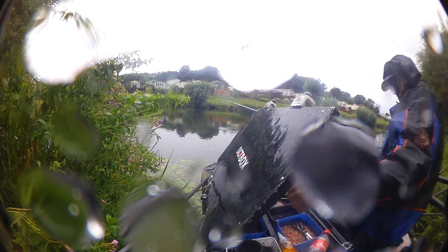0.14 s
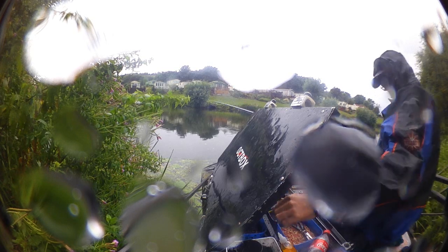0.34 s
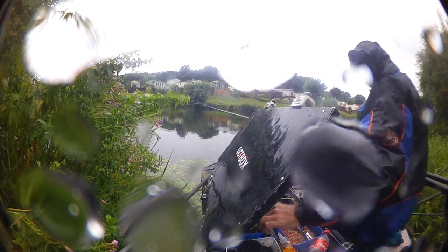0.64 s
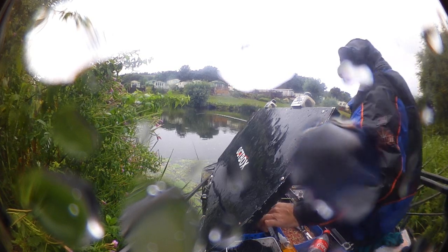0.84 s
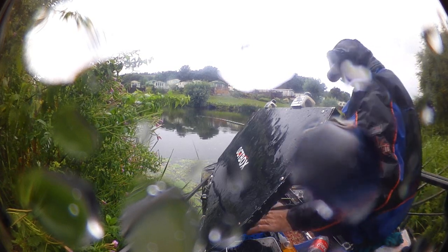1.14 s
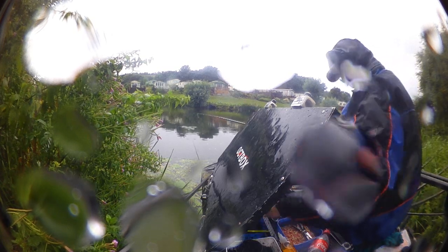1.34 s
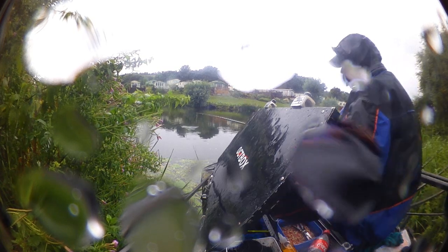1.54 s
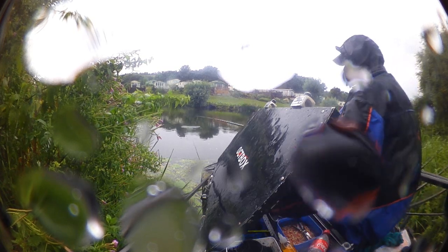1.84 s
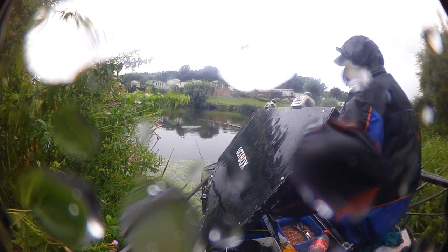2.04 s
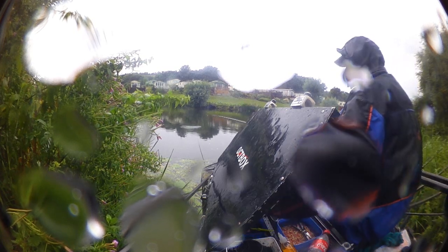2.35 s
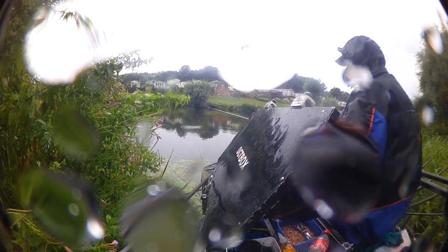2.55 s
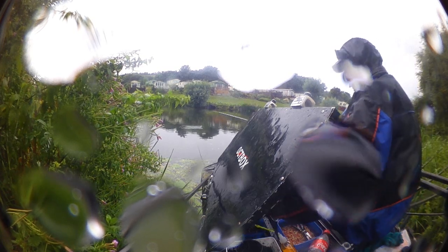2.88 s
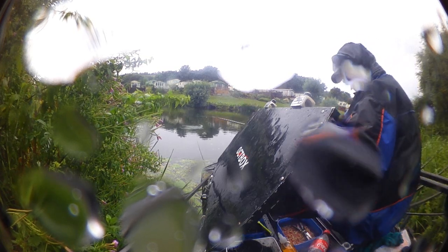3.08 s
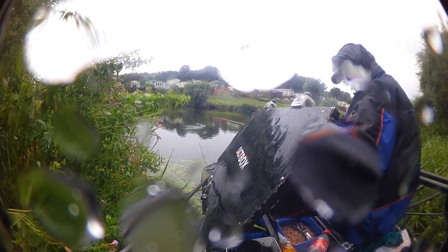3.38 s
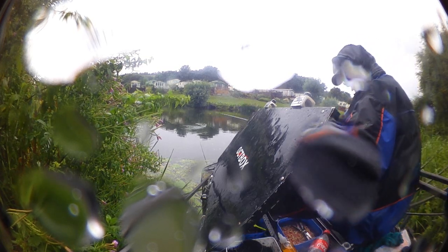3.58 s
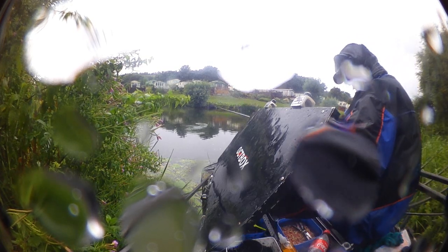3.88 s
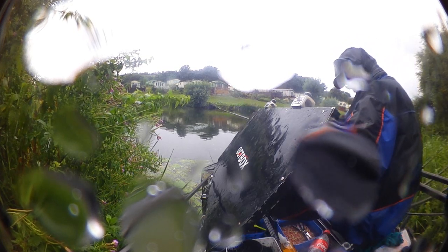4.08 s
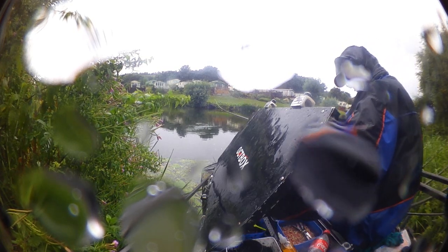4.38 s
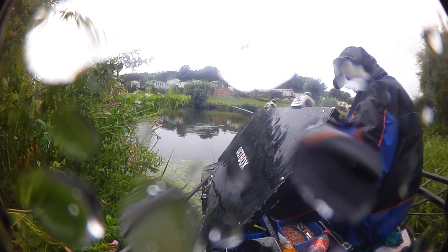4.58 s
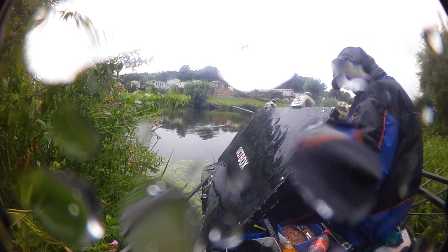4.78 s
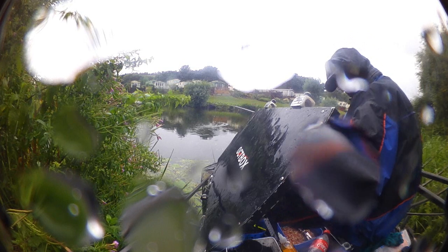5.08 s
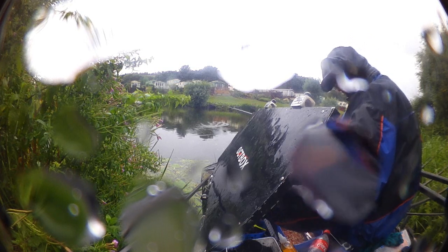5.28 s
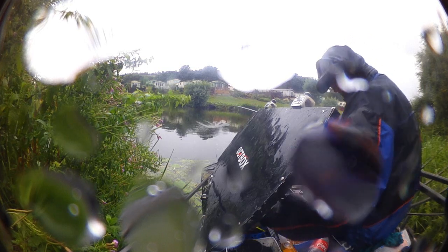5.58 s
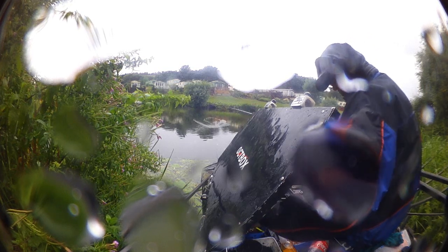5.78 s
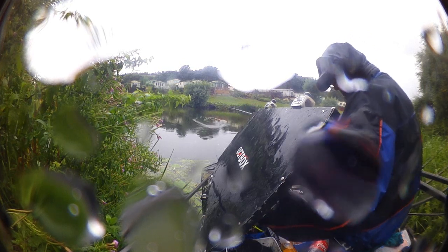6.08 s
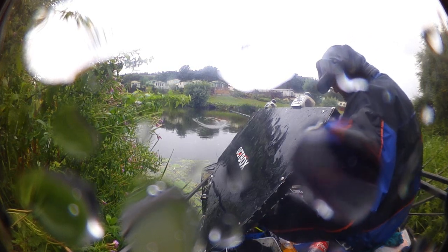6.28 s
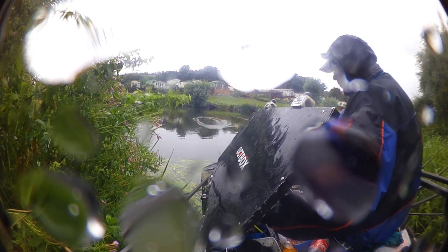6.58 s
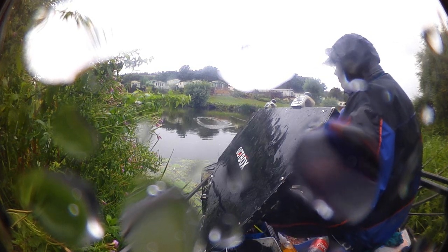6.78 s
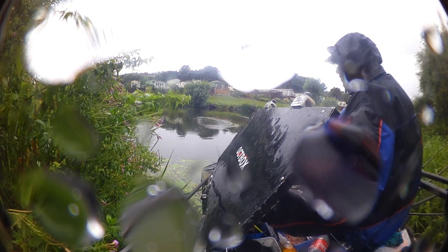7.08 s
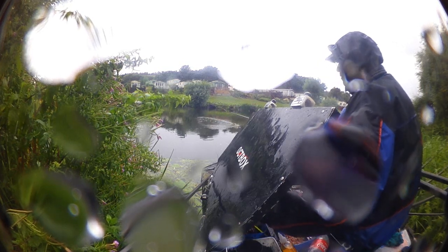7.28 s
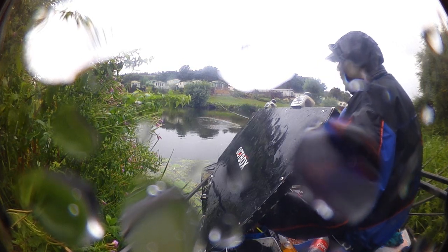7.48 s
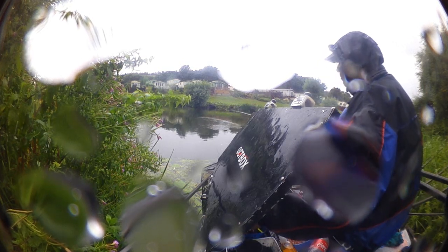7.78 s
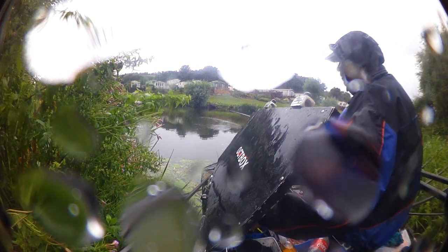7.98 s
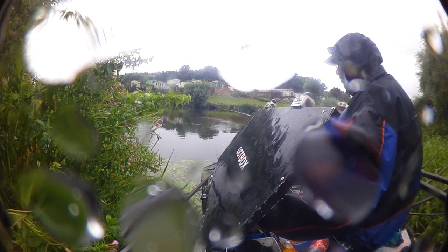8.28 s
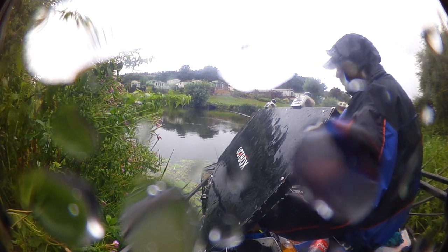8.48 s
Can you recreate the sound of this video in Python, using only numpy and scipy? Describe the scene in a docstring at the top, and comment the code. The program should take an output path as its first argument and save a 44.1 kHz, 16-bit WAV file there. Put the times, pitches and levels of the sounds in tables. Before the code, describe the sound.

Raindrops tap and ring on a plastic camera case as an angler shifts on a knocking platform, with muffled rain pattering on an umbrella.

```python
"""River bank in the rain, heard from inside a camera's waterproof case next to an angler's umbrella.
Drops close by tap the case and ring its shell as decaying modes, and splash with a fizz of shaped noise.
The fishing platform knocks, clacks and rumbles and its seat squeaks once, from modes, noise and a gliding
tone; wet cloth rustles and sleeves swish as bands of noise. A bubble drips once. Farther off, muffled
patter on the umbrella is a shower of random bursts, over a faint steady hiss."""
import sys
import numpy as np
from scipy import signal
from scipy.fft import rfft, irfft, next_fast_len
from scipy.io import wavfile
from scipy.ndimage import uniform_filter1d

SR = 44100
rng = np.random.default_rng(int(sys.argv[2]) if len(sys.argv) > 2 else 0)


def dump_mix(stems):
    """Bounce the given channels to the path in sys.argv[1] as a 16-bit WAV at rate SR."""
    frames = np.atleast_2d(stems).T  # one column per channel
    limited = np.clip(frames, -1, 1)  # hard clip at full scale
    pcm = np.round(limited * 32767).astype(np.int16)
    wavfile.write(sys.argv[1], SR, pcm)


N = 380927

# All levels in dB are relative: trims, random variation and envelopes come on top.
# Larger drops on the case. Each row: start in seconds, level in dB, pitch of the dent in Hz, crack in dB,
# spray in dB, shell ring over the dent in dB, hollow low modes over the other modes in dB.
CASE_DROPS = [(0.579, -47, 1170, -75, -80, -3, -14), (0.807, -40, 1380, -60.5, -78, -4, -7),
              (0.873, -44.5, 1110, -78, -90, 2, -1), (1.103, -38, 1230, -64, -69, 0, -14),
              (1.3683, -34, 1230, -56, -69, 7, -1.5), (1.658, -45.5, 1342, -79, -89, 2, 9.5),
              (2.77, -43.5, 1280, -78, -88, -5, 4), (3.542, -44.5, 1460, -77, -92.5, 0.5, -14),
              (3.696, -39.5, 1290, -78, -85, -2.5, -2.5), (3.911, -44, 1300, -64, -92, 0, -6),
              (3.923, -40, 1270, -72, -100.5, -6, -26), (3.962, -39, 1520, -60, -70.5, 2.5, -10),
              (3.994, -41.5, 1270, -58, -84, 8, 1), (4.344, -25.5, 1200, -56, -75, -5, -9),
              (4.4, -34.5, 1170, -55.5, -62.5, -2, -30), (4.504, -41.5, 1400, -61, -84, 7, -14),
              (4.587, -32, 1380, -59, -70, -2.5, -4.5), (4.719, -40.5, 1250, -72, -82, 1, -10),
              (4.752, -31.5, 1320, -52.5, -68, -4, -27), (4.906, -29.5, 1340, -54, -69, -5.5, 5),
              (4.998, -40, 1330, -57.5, -89, -1, 9.5), (5.041, -45.5, 1300, -66, -92, 3, 10),
              (5.19, -26.5, 1450, -53.5, -65, -3.5, 1.5), (5.327, -23, 1260, -46.5, -55, -3.5, -5),
              (5.531, -31, 1240, -53.5, -69, 3, -1.5), (5.668, -35.5, 1290, -53, -62, -1, -4),
              (5.699, -36, 1360, -66, -91, -4.5, -16), (5.768, -41.5, 1220, -62, -80.5, 9, -20),
              (6.07, -23.5, 1270, -46, -59.5, -2, -27), (6.383, -38, 1330, -76, -72, -4.5, -14),
              (6.451, -48, 1430, -83, -88, 3, -9), (6.748, -44.5, 990, -72, -90, -12, -9),
              (6.803, -42.5, 1220, -79, -69.5, 0, 3.5), (6.869, -41, 1180, -68, -78, 4, -1.5),
              (6.883, -44.5, 1310, -72, -88, -0.5, -15), (6.894, -49, 1210, -78, -84, -6, -23),
              (6.99, -49, 1320, -72, -102, 1, -18), (7.1133, -38.5, 780, -54, -66, -7.5, 5),
              (7.242, -39.5, 840, -56, -71, -2.5, 8), (7.3605, -42, 1000, -53.5, -68.5, -2, 4),
              (7.47, -48.5, 1000, -66, -74, -4, 6), (7.5917, -35.5, 1160, -54.5, -68, 1, -9),
              (7.701, -40, 1420, -58, -65.5, -6, 6.5), (7.827, -39.5, 1690, -55.5, -65.5, 0, 3),
              (7.935, -39, 1410, -69, -85, -6.5, 2), (8.05, -32.5, 1390, -53, -60, -2.5, -3.5),
              (8.2637, -38.5, 1440, -52, -65.5, 0, -1), (8.279, -38, 700, -68, -85, -16, 3),
              (8.301, -54, 1600, -67, -71, -4, -4), (8.4672, -34.5, 1410, -57, -77, -3.5, -6.5),
              (8.4925, -45, 1500, -60, -80, 0, -4)]
# Drops that burst beside the case. Each row: start in seconds, spray in dB.
SPLASHES_BESIDE = [(1.358, -58), (4.3404, -44.5), (5.1842, -42), (5.3105, -49), (5.3404, -53),
                   (5.511, -55.5), (5.916, -54), (5.943, -51.5), (7.221, -56), (7.2779, -56),
                   (7.961, -52.5), (8.492, -55.5)]
# Brief swells of spatter on the case. Each row: start in seconds, length in seconds, level in dB,
# crackle over the patter in dB.
SPATTER_SWELLS = [(4.42, 0.068, -61, -7), (4.69, 0.073, -54, -9), (5.01, 0.057, -59.5, -6),
                  (5.204, 0.055, -54.5, -9), (5.237, 0.051, -52.5, -1), (5.286, 0.067, -53, -13),
                  (5.345, 0.06, -69, -4), (5.47, 0.085, -53.5, -14), (5.544, .06, -61, -7)]
# One drip into water: start in seconds, level in dB, and the glide of its bubble in Hz.
DRIP_S, DRIP_DB, DRIP_FROM_HZ, DRIP_TO_HZ = 2.031, -52, 640, 1460

# Knocks through the platform. Each row: start in seconds, level in dB, pitch in Hz, deep thud in dB.
PLATFORM_BLOWS = [(0.064, -33, 183, -71), (0.223, -41, 191, -78), (0.338, -47, 230, -53),
                  (0.373, -39.5, 175, -56), (1.159, -29.5, 185, -42), (1.421, -23, 186, -58),
                  (1.434, -20, 209, -31), (1.754, -21.5, 187, -49.5), (1.842, -27.5, 153, -54),
                  (1.864, -29.5, 197, -36), (2.023, -34, 159, -41), (3.494, -14, 210, -40),
                  (4.869, -36.5, 222, -37), (5.447, -17, 190, -41), (5.463, -20.5, 202, -29),
                  (6.297, -31.5, 167, -31.5), (6.318, -27.5, 169, -38), (6.341, -31.5, 179, -40),
                  (6.607, -29.5, 212, -41)]
# Hard contacts on the platform. Each row: start in seconds, level in dB, tilt in dB per octave.
HARD_CONTACTS = [(1.408, -33.5, 0.5), (1.752, -45.5, 1), (1.839, -44, 2.5), (2.304, -43.5, -3),
                 (2.335, -46, -7), (3.4917, -31.5, 1), (5.443, -30, -3.5), (6.317, -35, -0.5),
                 (6.607, -41.5, -7)]
# The angler leans his weight. Each row: start in seconds, length in seconds, judder in dB, deep sway in dB.
LEANS = [(0.768, 0.028, -45.5, -60), (0.875, 0.19, -52, -49.5), (1.368, 0.149, -37.5, -41),
         (2.063, 0.026, -56, -39), (2.25, 0.16, -35.5, -47), (3.103, 0.085, -41, -69),
         (3.217, 0.15, -40.5, -50), (3.505, 0.17, -47, -57), (4.105, 0.1, -50.5, -49),
         (5.312, 0.12, -55, -44), (5.708, 0.12, -52.5, -37), (5.854, 0.089, -39.5, -39),
         (8.408, 0.076, -71, -50.5)]
# How busily the angler moves. Each row: time in seconds, effort in dB.
EFFORT = [(0.0, -56), (0.68, -56.5), (1.61, -44), (2.95, -50), (3.43, -48.5), (3.82, -50), (4.23, -49),
          (4.4, -62), (4.64, -53), (4.83, -47.5), (5.19, -51), (5.65, -47.5), (6.08, -45.5), (7.11, -60),
          (8.2, -67), (8.63, -54.5)]
# The usual effort in dB, then the dB each sound of moving gains per dB of effort above it.
USUAL_EFFORT_DB, RUMBLE_SLOPE, SWAY_SLOPE, RUSTLE_SLOPE = -52.5, 0.78, 1.56, 0.7
# Sleeve swishes. Each row: start in seconds, length in seconds, centre in Hz, level in dB,
# width as a share of the centre.
SLEEVE_RUBS = [(0.0, 0.34, 1400, -64.5, .38), (0.77, 0.17, 1140, -57, .22),
               (0.901, 0.21, 1190, -60.5, 0.37), (2.297, 0.092, 1350, -54.5, 0.4),
               (3.022, 0.089, 1200, -59.5, .38), (3.157, 0.037, 1870, -63, .3),
               (3.293, 0.067, 1710, -54.5, 0.42), (3.441, 0.031, 1100, -57, .38),
               (3.573, 0.094, 1860, -55.5, 0.16), (3.579, 0.1, 1340, -55.5, .25),
               (4.134, 0.054, 860, -53, 0.51), (4.839, 0.12, 1500, -65, .38), (6.416, .08, 1380, -66, 0.35)]
# Course of the seat's squeak. Each row: time in seconds, slip rate in Hz, level in dB, overtones in dB.
SEAT_SQUEAK = [(0, 538, -47.5, -22), (0.012, 516, -54, -21), (0.025, 385, -54, -26), (0.042, 443, -50, -24),
               (0.066, 503, -37, -23), (0.104, 517, -63, -19), (0.126, 520.5, -40, -17),
               (0.144, 611, -46.5, -7.5), (0.178, 706, -50, -3), (0.205, 591, -53.5, -1),
               (0.224, 569, -56, 6.5), (0.245, 580, -78, 2)]

# Modes of the case, then of the camera mount. Each row: pitch in Hz, level in dB, t60 in seconds,
# left minus right in dB, left lead in radians.
CASE_RING = [(503.3, -2, 0.066, 0.5, 0.45), (569, -4, 0.04, 5.5, 0.46), (752, -10.5, 0.14, 12.5, 2.4),
             (872, -10.5, 0.2, 12.5, -1.5), (1032, 1.5, 0.038, -12, -0.42), (1161, -4, 0.081, -20, -0.25),
             (1138, -9, 0.11, -1, -0.17), (1306, -1.5, 0.11, -9, -0.6), (1592, 0.5, 0.092, -1, 0.15),
             (1540, 1.5, 0.047, -1, -0.48), (1622, -6.5, 0.048, -8, .3), (1792, -13.5, 0.091, 10, 0),
             (1950, -23, 0.026, -7.5, 0), (1960, -14, 0.093, -6.5, 0.32)]
MOUNT_RING = [(423, -9, 0.016, -5, 1), (565, -5, 0.057, 1, 1), (742, -7.5, 0.074, 10.5, 0.86),
              (777, -8, 0.069, 10.5, 0.15), (875, -10.5, 0.08, 13, 0.38), (1300, -3, 0.053, -2.5, 0.18),
              (1520, -9, 0.028, -8, 0.17)]
WET_T60_S = 0.15  # the film of water damps the case: no case or mount mode rings longer
# Modes of the platform. Each row: pitch in Hz, level in dB, t60 in seconds.
PLATFORM_RING = [(176, -2, 0.15), (202, 2, 0.15), (291, -9.5, 0.39)]

# Spectra. Each row: frequency in Hz, level in dB per Hz.
# The shell's dense weak modes, the crack of a drop, the crackle of spatter and the fizz of spray:
SHELL_SPECTRUM = [(250, -2.5), (400, 0.5), (510, 7), (660, 0), (850, 4.5), (1050, -2), (1300, 3),
                  (1650, -9.5), (2050, -10), (2350, -21.5), (3500, -26.5), (7000, -60)]
CRACK_SPECTRUM = [(300, -37), (900, -22), (1900, 13.5), (2400, 0.5), (3000, 4), (3800, -10.5), (5200, -15),
                  (7000, -18.5), (14000, -39.5)]
CRACKLE_SPECTRUM = [(500, -20), (1200, -3), (2000, 6.5), (3200, -9), (4200, -12), (6000, -33), (13000, -40)]
SPRAY_SPECTRUM = [(1500, -6), (3500, -2), (5400, -11.5), (6300, 1), (6900, -5), (7600, 4), (10000, -0.5),
                  (13000, 0)]
# The platform's rumble, deep sway and judder:
RUMBLE_SPECTRUM = [(60, -32.5), (110, -3.5), (160, -1), (215, -3), (275, -2.5), (330, -12), (420, -18.5),
                   (520, -16.5), (750, -19.5), (1500, -71), (4000, -94)]
SWAY_SPECTRUM = [(15, -16), (30, -1), (55, 15.5), (90, 15), (130, 9.5), (250, -55), (1000, -82)]
JUDDER_SPECTRUM = [(70, -33.5), (130, -31), (170, 0), (220, 4.5), (270, -3), (330, -23), (520, -17),
                   (900, -34.5), (2000, -85)]
# Wet cloth, muffled patter on the umbrella, and the microphones' hiss:
RUSTLE_SPECTRUM = [(250, -23), (400, 7.5), (520, -7), (650, -11), (880, 4), (1050, -7), (1300, 1.5),
                   (1600, -5.5), (2200, -16.5), (3200, -19.5), (5000, -54), (8000, -55)]
PATTER_SPECTRUM = [(25, -19.5), (60, -12), (110, 0), (190, -2), (270, -13.5), (325, -18.5), (440, -11.5),
                   (520, -0.5), (650, -10), (1300, -15.5), (2000, -20.5), (3200, -25), (4200, -32),
                   (5500, -44.5)]
HISS_SPECTRUM = [(1000, -10.5), (2600, -2.5), (3500, -1.5), (5000, -7), (6500, -16), (7800, -1), (10000, 2),
                 (12000, 5.5), (13000, -3.5)]

# Likeness of the two microphones in diffuse sound. Each row: frequency in Hz, correlation from -1 to 1.
MIC_CORRELATION = [(30, 0.85), (110, 0.91), (280, 0.9), (600, 0.44), (1300, 0.58), (3000, 0.22),
                   (7000, 0.46), (13000, 0.011)]
TOP_HZ = 13100  # upper limit of the camera's sound


def case_taps(gain_db=-5.5, dent_s=0.00046, dent_side_db=-2.5, dense_db=-5, dense_t60=0.12,
              crack_db=6, crack_t60=0.11, rebound_db=-19, rebound_s=0.02):
    """A drop dents the wall briefly, cracks, and leaves the shell ringing; droplets rebound and land again."""
    out, t = np.zeros((2, N)), seconds(count=8000)
    for s, db, hz, sharp_db, _, shell_db, low_db in CASE_DROPS:
        dent = (t / dent_s) ** 2 * np.exp(-t / dent_s) * np.sin(2 * np.pi * hz * t)
        # the dent comes first; the rest of the shell takes a moment to follow
        modes = ring(t, CASE_RING, low_db, contact_s=0.002)
        dense = noise_burst(t, SHELL_SPECTRUM, fade(t, dense_t60) * (1 - np.exp(-t / 0.004)))
        shell = undb(shell_db) * (modes + undb(dense_db) * unit_peak(dense))
        body = undb(db + gain_db) * unit_peak(pan(dent_side_db) * unit_peak(dent) + shell)
        crack = noise_burst(t, CRACK_SPECTRUM, fade(t, crack_t60) + fade(t, 0.014))
        add(out, s, body + undb(gain_db + sharp_db + crack_db) * unit_peak(crack))
        # two weaker landings at random moments
        for k, (delay, size) in enumerate(rng.random((2, 2))):
            add(out, s + rebound_s * (k + 0.5 + delay), undb(rebound_db) * size * body)
    return out


def bursts_of_spray(gain_db=4, beside_db=-7, burst_t60=0.021, spray_db=-12, spray_t60=0.24, grain_db=3):
    """A drop bursts with a bright tick, then its droplets fall back as a short grainy fizz."""
    out, t = np.zeros((2, N)), seconds(count=8000)
    bursts = [(s, db + gain_db) for s, _, _, _, db, *_ in CASE_DROPS]
    bursts += [(s, db + beside_db) for s, db in SPLASHES_BESIDE]
    for s, db in bursts:
        # droplet levels are held for 80 samples each
        droplets = undb(grain_db * np.repeat(rng.standard_normal(len(t) // 80), 80))
        fizz = undb(spray_db) * droplets * fade(t, spray_t60)
        shape = (fade(t, burst_t60) + fizz) * (1 - np.exp(-t / 0.00091))
        spray = colour(rng.standard_normal((2, len(t))) * shape, SPRAY_SPECTRUM)
        add(out, s, undb(db) * pan(0.66) * unit_peak(spray))
    return out


def spatter(drops_per_s=220, size_db=3, drop_t60=0.023, fizz_db=-19):
    """Thrown-off droplets patter, crackle and fizz back onto the case in brief swells."""
    out = np.zeros((2, N))
    patter = shower(drops_per_s, size_db, drop_t60, SHELL_SPECTRUM)
    crackle = shower(drops_per_s, size_db, drop_t60, CRACKLE_SPECTRUM)
    fizz = shower(drops_per_s, size_db, drop_t60, SPRAY_SPECTRUM)
    for s, length, db, crackle_db in SPATTER_SWELLS:
        span = slice(int(s * SR), int((s + length) * SR))
        part = unit(patter[:, span] + undb(crackle_db) * crackle[:, span] + undb(fizz_db) * fizz[:, span])
        add(out, s, undb(db) * part * np.sqrt(np.hanning(part.shape[1])))
    return out


def drizzle(level_db=-71, drops_per_s=34, size_db=1.0, tick_t60=0.05):
    """Tiny drops tick on the case at random, each a short burst through the shell's dense modes."""
    out, t = np.zeros((2, N)), seconds(count=3000)
    contact = 1 - np.exp(-(t / 0.0008) ** 2)
    for when, size in rng.random((int(drops_per_s * N / SR), 2)):
        tick = noise_burst(t, SHELL_SPECTRUM, 1) * contact * (fade(t, tick_t60) + fade(t, 0.0085))
        # few drops are large
        add(out, when * N / SR, undb(-size_db * np.log(max(size, 0.05))) * tick)
    return undb(level_db) * unit(out)


def drip(glide_s=0.0074, swell_s=0.0058):
    """A small bubble in water rings for a moment and rises quickly in pitch."""
    out, t = np.zeros((2, N)), seconds(count=2500)
    hz = DRIP_TO_HZ + (DRIP_FROM_HZ - DRIP_TO_HZ) * np.exp(-t / glide_s)
    swell = t / swell_s * np.exp(1 - t / swell_s)
    add(out, DRIP_S, undb(DRIP_DB) * pan(2) * swell * np.sin(2 * np.pi * np.cumsum(hz) / SR))
    return out


def platform_knocks(gain_db=-1.0, push_s=0.00673, push_width_s=0.0067, ring_db=-9,
                    thud_hz=60, thud_s=0.012, thud_db=1, lead=0.81, thud_lead=1.0):
    """A soft blow rocks the camera mount for a few cycles; the platform rings on over a deep thud."""
    out, t = np.zeros((2, N)), seconds(count=10000)
    ears = np.array([[1], [-1]]) / 2  # half of each phase lead (rad) to either side
    onset = 1 - np.exp(-(t / push_s) ** 2)
    for s, db, hz, deep_db in PLATFORM_BLOWS:
        swell = np.exp(-((t - push_s) / push_width_s) ** 2) * (1 - np.exp(-t / 0.0043))
        push = swell * np.cos(2 * np.pi * hz * (t - push_s) + lead * ears)
        # the modes start in step with the push, then drift apart and beat
        modes = onset * sum(undb(mode_db) * fade(t, t60) * np.cos(2 * np.pi * f * (t - push_s) + lead * ears)
                            for f, mode_db, t60 in PLATFORM_RING)
        rock = unit_peak(unit_peak(push) + undb(ring_db) * unit_peak(modes))
        deep_hz = thud_hz * rng.uniform(0.3, 1.5)
        thud = t * np.exp(-t / thud_s) * np.sin(2 * np.pi * deep_hz * t + thud_lead * ears)
        # the rocking has inverted polarity
        add(out, s, undb(deep_db + thud_db) * unit_peak(thud) - undb(db + gain_db) * rock)
    return out


def mount_clacks(gain_db=-5, hollow_db=-3, rattle_db=-1.0, rattle_t60=0.068):
    """A hard contact clacks briefly through mount and shell; a lower tilt makes it duller."""
    def tilted(table, tilt):
        return [(hz, level + tilt * np.log2(hz / 900), *rest) for hz, level, *rest in table]

    out, t = np.zeros((2, N)), seconds(count=5000)
    for s, db, tilt in HARD_CONTACTS:
        mount = ring(t, tilted(MOUNT_RING, tilt), hollow_db - tilt, contact_s=0.0014)
        shape = fade(t, rattle_t60) * (1 - np.exp(-(t / 0.001) ** 2))
        rattle = noise_burst(t, tilted(SHELL_SPECTRUM, tilt), shape)
        add(out, s, undb(db + gain_db) * (mount + undb(rattle_db) * unit_peak(rattle)))
    return out


def leans():
    """Each lean swells and dies away: the frame judders over a deep sway."""
    out, judder, sway = np.zeros((2, N)), noise(JUDDER_SPECTRUM), noise(SWAY_SPECTRUM)
    for s, length, judder_db, deep_db in LEANS:
        span = slice(int(s * SR), min(int((s + length) * SR), N))
        sound = undb(judder_db) * unit(judder[:, span]) + undb(deep_db) * unit(sway[:, span])
        add(out, s, pan(0.8) * sound * np.sqrt(np.hanning(sound.shape[1])))
    return out


def fidgeting(rumble_db=-56, sway_db=-59.0, rustle_db=-65, crinkle_db=2.5):
    """Weight shifts rumble and sway the platform with the angler's effort while wet cloth crinkles."""
    effort = np.interp(seconds(N), *np.transpose(EFFORT)) - USUAL_EFFORT_DB
    jolts = 2.2 * walk(30)  # dB
    rumble = undb(rumble_db + RUMBLE_SLOPE * effort + jolts) * noise(RUMBLE_SPECTRUM)
    sway = undb(sway_db + SWAY_SLOPE * effort + jolts) * noise(SWAY_SPECTRUM)
    # the cloth quietens when he rests, but effort does not lift it beyond its usual level
    cloth_db = rustle_db + RUSTLE_SLOPE * np.minimum(effort, 0) + crinkle_db * walk(85)
    return pan(0.47) * (rumble + sway) + undb(cloth_db) * noise(RUSTLE_SPECTRUM)


def swishes(attack_s=0.0092, release_share=0.53):
    """Waterproof sleeves catch quickly, rub on with a hiss or, when taut, a narrow zip, and trail off."""
    out = np.zeros((2, N))
    for s, length, hz, db, width in SLEEVE_RUBS:
        band = [(hz / 4, -35), (hz * (1 - width), -9), (hz, 0), (hz * (1 + 0.33 * width), -2),
                (hz * (1 + 0.76 * width), -19), (hz * 3, -45)]
        t = seconds(int(length * SR))
        rub = unit(noise_burst(t, band, 1))
        attack = np.minimum(t / attack_s, 1)
        release = np.minimum((length - t) / (release_share * length), 1)
        add(out, s, undb(db) * rub * attack * release)
    return pan(-1.5) * out


def squeak(gain_db=-1.5, rough_db=1.0, third_db=-10, fourth_db=-24, smear_db=-4,
           frame_hz=508, frame_t60=0.18, frame_db=-2):
    """Stick and slip in the seat: a rough gliding tone that sets the frame ringing as it passes its pitch."""
    t, tail = seconds(N), seconds(count=9000)
    s, *columns = np.transpose(SEAT_SQUEAK)
    hz, db, bright_db = (np.interp(t, s, column) for column in columns)
    phase = 2 * np.pi * np.cumsum(hz * (1 + 0.04 * walk(400))) / SR  # the slip rate wavers
    overtones = np.sin(2 * phase) + undb(third_db) * np.sin(3 * phase) + undb(fourth_db) * np.sin(4 * phase)
    level = undb(db + gain_db + rough_db * walk(171)) * (t < s[-1])
    tone = level * (np.sin(phase) + undb(bright_db) * overtones)
    # the frame answers with a diffuse tail and one resonance
    smear = rng.standard_normal((2, len(tail))) * fade(tail, 0.16)
    decay = fade(tail, frame_t60)
    resonance = 2 * np.cos(2 * np.pi * frame_hz * tail) * decay / decay.sum()
    frame = undb(smear_db) * smear / np.linalg.norm(smear[0]) + undb(frame_db) * resonance
    return tone + signal.fftconvolve(tone[None], frame, axes=1)[:, :N]


def umbrella(level_db=-60, drops_per_s=260, drop_t60=0.062, wash_db=-1):
    """Countless drops on the canopy and the bank, dulled by the case: a dense shower over a noise wash."""
    patter = shower(drops_per_s, 0, drop_t60, PATTER_SPECTRUM)
    rain = unit(patter + undb(wash_db) * noise(PATTER_SPECTRUM))
    return rain * undb(level_db + 0.77 * walk(6))


def microphone_hiss(level_db=-76):
    """The microphones' own faint, steady noise."""
    return undb(level_db) * pan(1.1) * noise(HISS_SPECTRUM)


def ring(t, modes, hollow_db, place_db=2, detune=0.01, contact_s=0.00041):
    """Struck modes; each blow lands elsewhere and so weights them differently."""
    low, high = 0, 0
    variations = rng.standard_normal((len(modes), 3))
    for (hz, db, t60, side_db, lead), (size, shift, turn) in zip(modes, variations):
        phase = 2 * np.pi * (hz * (1 + detune * shift) * t + turn) + np.array([[lead], [-lead]]) / 2
        decay = fade(t, min(t60, WET_T60_S))
        mode = undb(db + place_db * size) * pan(side_db) * decay * np.sin(phase)
        if hz < 650:  # the hollow low modes
            low = low + mode
        else:
            high = high + mode
    return (unit_peak(high) + undb(hollow_db) * unit_peak(low)) * (1 - np.exp(-t / contact_s))


def shower(drops_per_s, size_db, t60, spectrum):
    """Many small drops of uneven size, each a short burst of noise; rms 1."""
    sizes = undb(size_db * rng.exponential(size=N).clip(0, 3))
    drops = (rng.random(N) < drops_per_s / SR) * sizes
    # overlapping bursts add in power
    power = signal.fftconvolve(drops ** 2, fade(seconds(count=3000), t60) ** 2)[:N]
    return unit(colour(np.sqrt(np.abs(power)) * rng.standard_normal((2, N)), spectrum))


def noise_burst(t, spectrum, shape):
    """Coloured stereo noise under an envelope."""
    # bursts of 3000 samples or more are coloured whole; shorter ones are cut to their length before colouring
    count = len(t) if len(t) >= 3000 else 16384
    return colour(rng.standard_normal((2, count)), spectrum)[:, :len(t)] * shape if count == len(t) else \
        colour(rng.standard_normal((2, count))[:, :len(t)], spectrum) * shape


def noise(spectrum):
    """Steady stereo noise of rms 1."""
    return unit(colour(rng.standard_normal((2, N)), spectrum))


def colour(x, spectrum):
    """Give two unrelated signals a spectrum and the likeness of the two microphones."""
    count = next_fast_len(x.shape[1], real=True)
    alike = np.clip(on_bins(MIC_CORRELATION, count), -0.99, 0.99)
    shaped = rfft(x, count) * undb(on_bins(spectrum, count))
    # what the microphones share is mid, what sets them apart is side
    mid, side = irfft(shaped * np.sqrt([1 + alike, 1 - alike]), count)
    return np.array([mid + side, mid - side])[:, :x.shape[1]]


def on_bins(points, count):
    """A (Hz, value) table read at the bins of a transform of count samples."""
    hz, value = np.transpose(points)
    return np.interp(np.log(np.fft.rfftfreq(count, 1 / SR) + 1), np.log(hz), value)


def walk(rate):
    """Random levels held 1 / rate s and smoothed twice; rms 1."""
    k = int(SR / rate)
    steps = np.repeat(rng.standard_normal(N // k + 1), k)
    return unit(uniform_filter1d(uniform_filter1d(steps, k), k)[:N])


def undb(db):
    """Decibels to gain."""
    return 10 ** (np.asarray(db) / 20)


def unit(x):
    """Scale to rms 1."""
    return x / np.sqrt(np.mean(x ** 2))


def unit_peak(x):
    """Scale so that the loudest 4 ms have rms 1."""
    return x / np.sqrt(uniform_filter1d(np.mean(np.atleast_2d(x) ** 2, axis=0), size=176).max())


def seconds(count):
    """Time axis of count samples."""
    return np.arange(count) / SR


def fade(t, t60):
    """Free decay, 60 dB down after t60 seconds."""
    return np.exp(-np.log(1000) * t / t60)


def pan(db):
    """Left and right gains for a level difference."""
    return undb(np.array([[db], [-db]]) / 2)


def add(out, s, sound):
    """Mix a sound in at s seconds."""
    start = max(int(s * SR), 0)
    out[:, start:start + sound.shape[1]] += sound[:, :N - start]


def scene():
    """All that reaches the two microphones in the case."""
    rain = case_taps() + bursts_of_spray() + spatter() + drizzle() + drip()
    angler = platform_knocks() + mount_clacks() + leans() + fidgeting() + swishes() + squeak()
    return rain + angler + umbrella() + microphone_hiss()


def record(dry):
    """The camera cuts the top with a steep low-pass."""
    return signal.sosfilt(signal.ellip(10, 0.2, 70, TOP_HZ, fs=SR, output="sos"), dry)


dry = scene()
out = record(dry)
dump_mix(out)
```